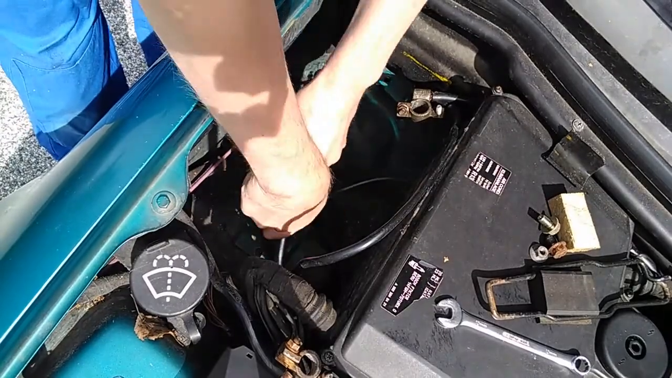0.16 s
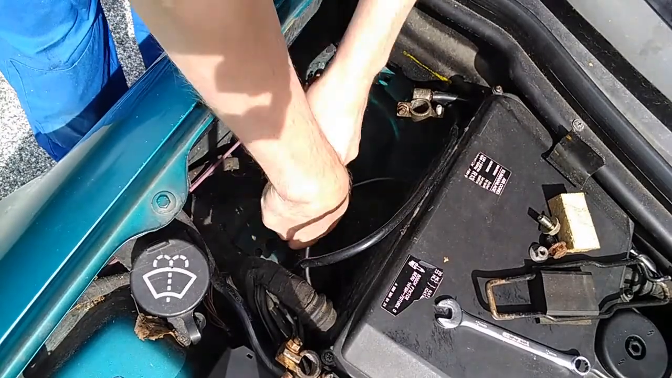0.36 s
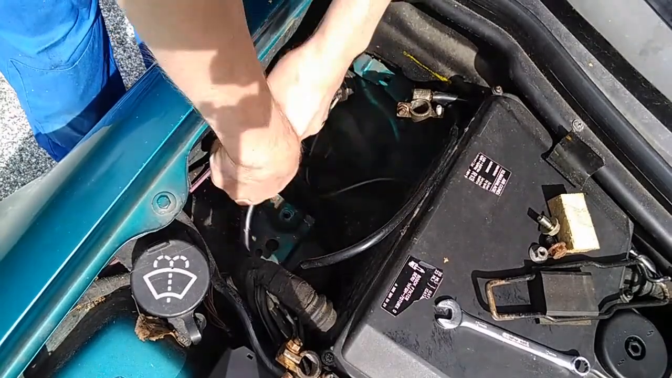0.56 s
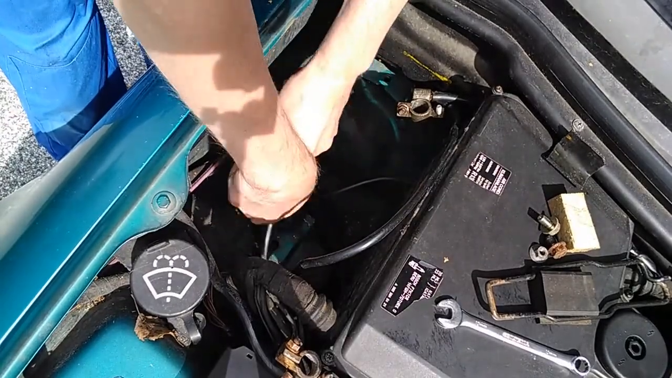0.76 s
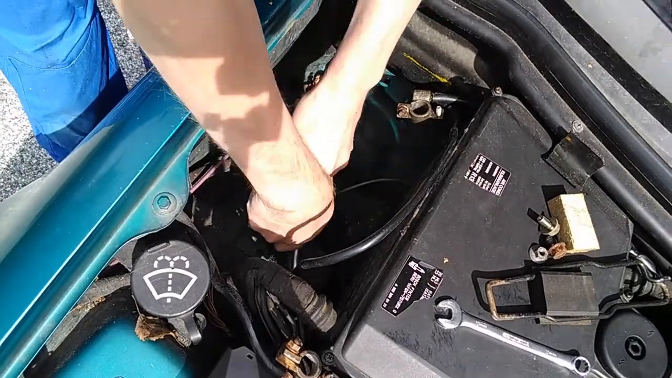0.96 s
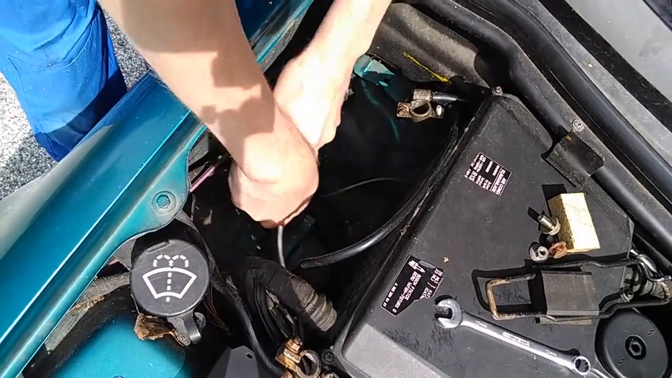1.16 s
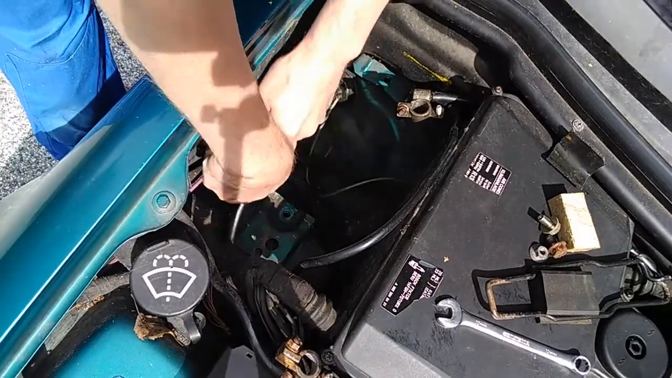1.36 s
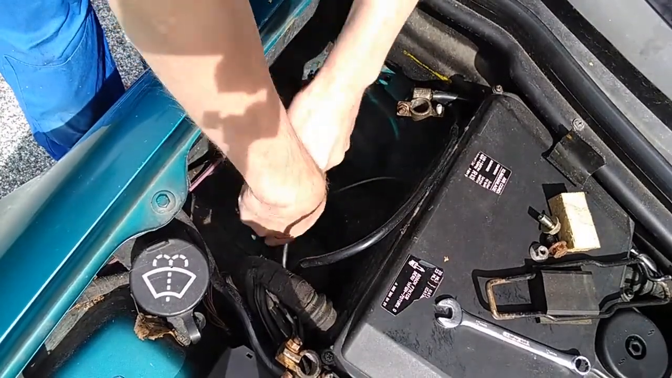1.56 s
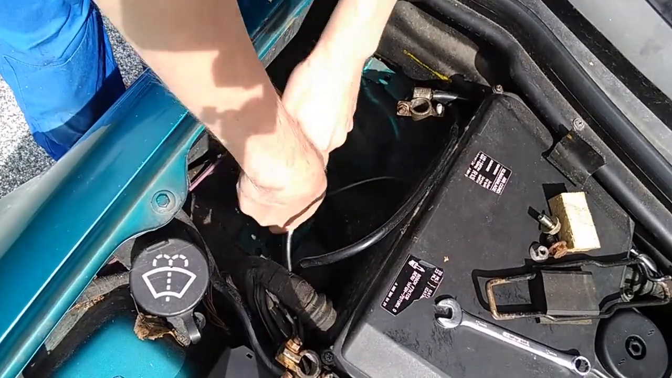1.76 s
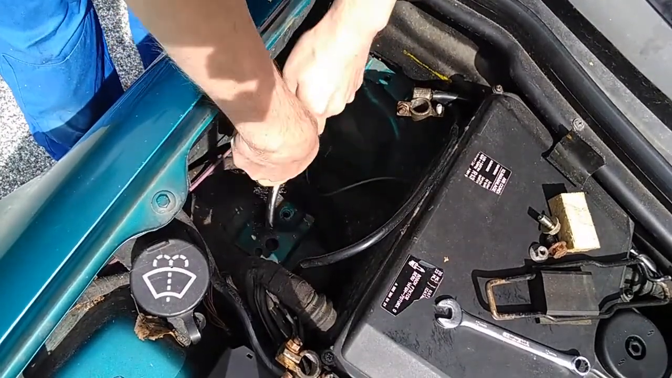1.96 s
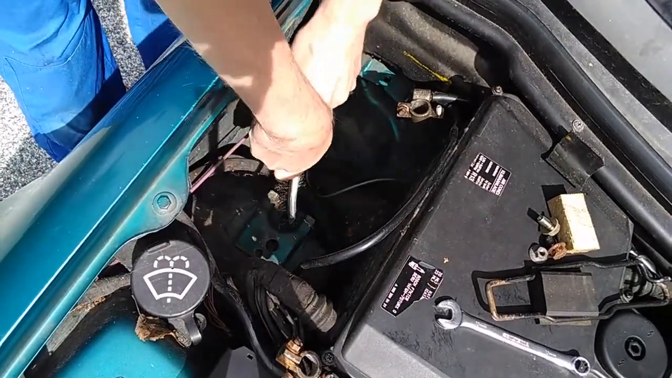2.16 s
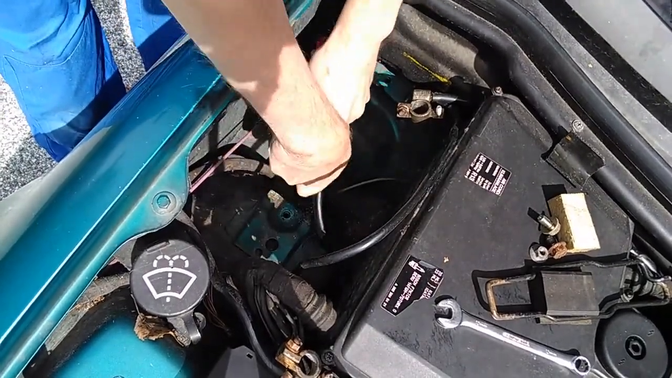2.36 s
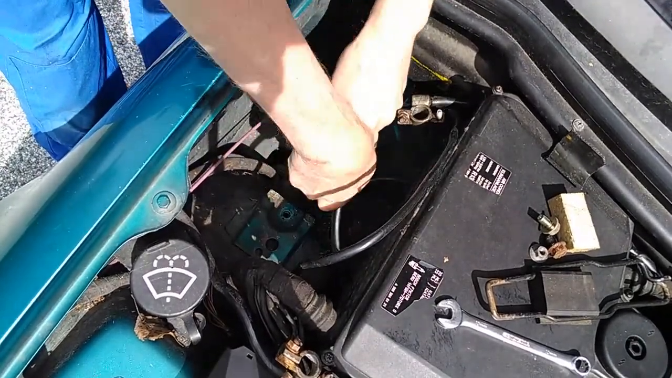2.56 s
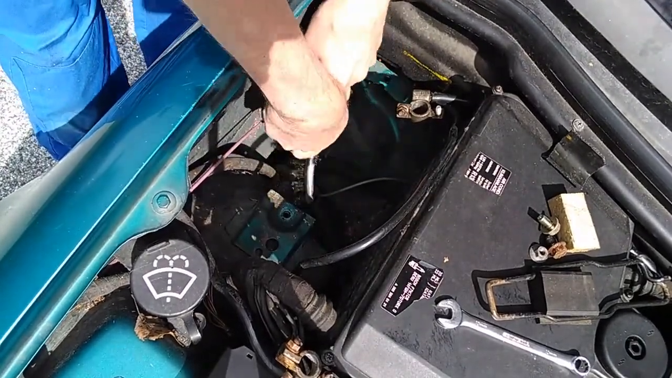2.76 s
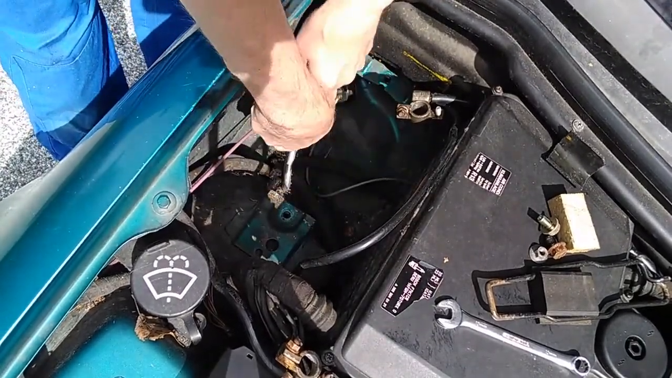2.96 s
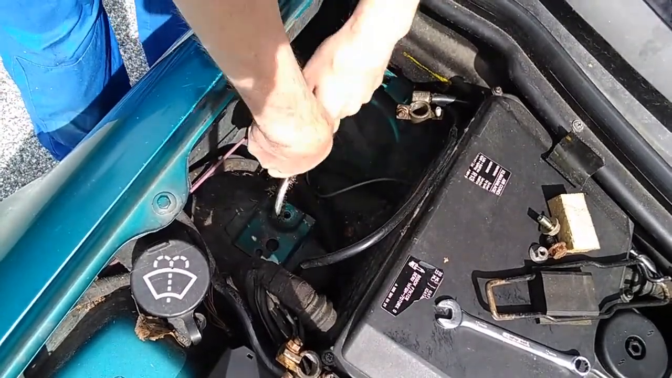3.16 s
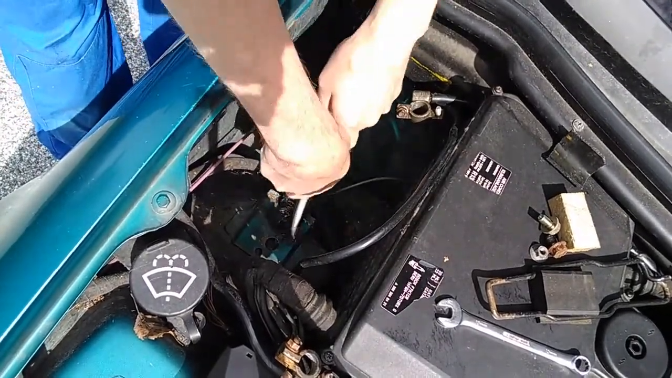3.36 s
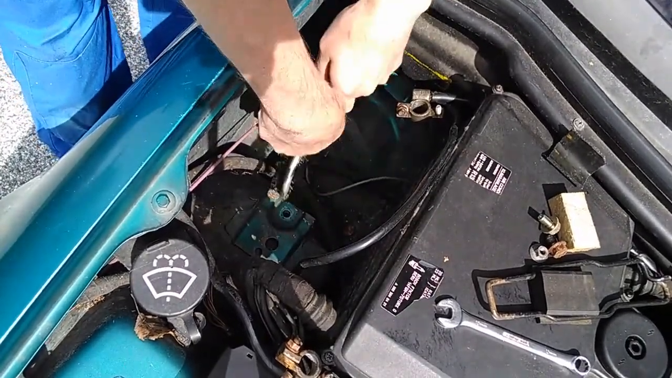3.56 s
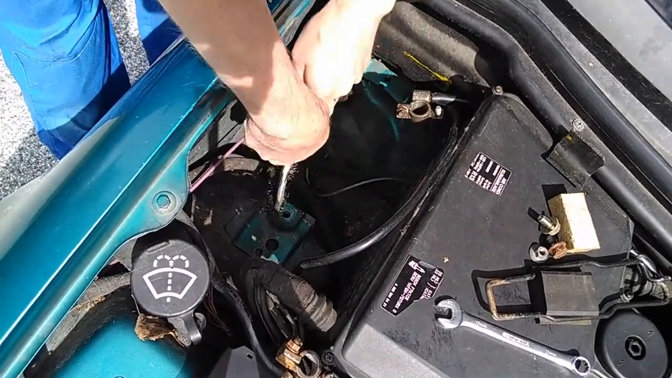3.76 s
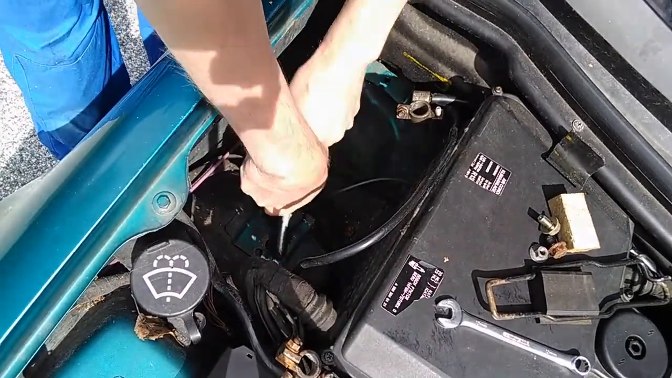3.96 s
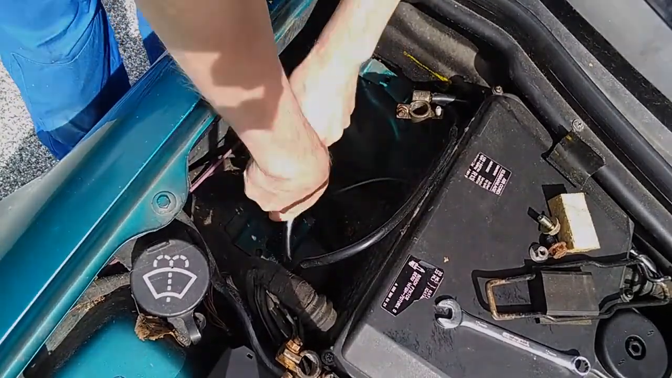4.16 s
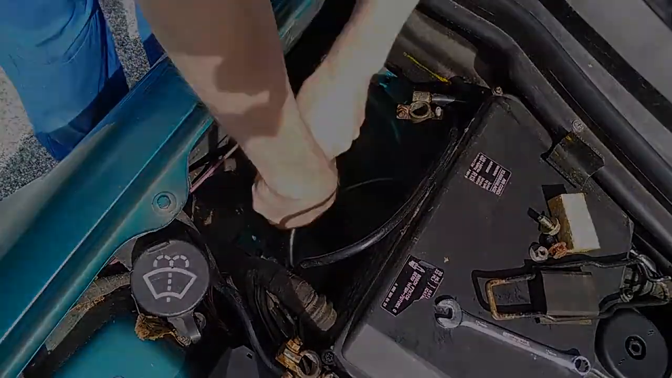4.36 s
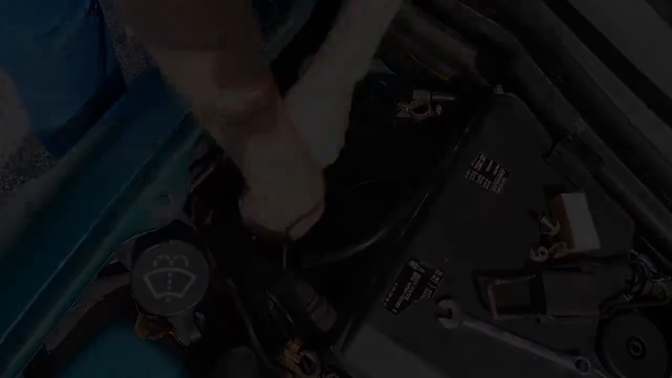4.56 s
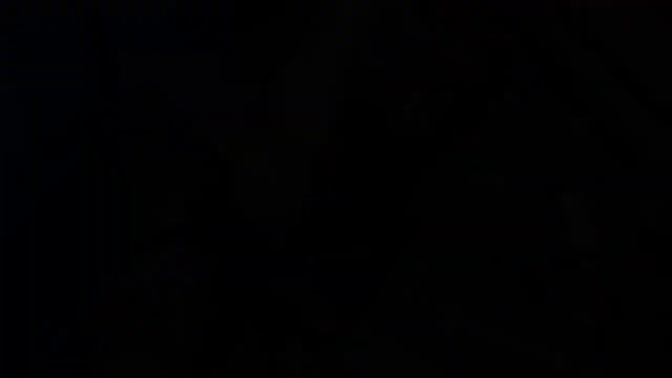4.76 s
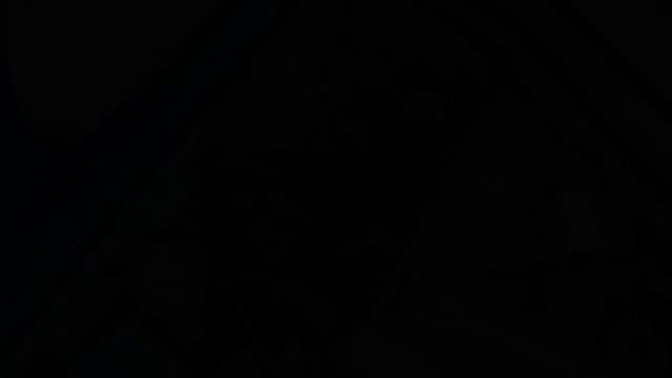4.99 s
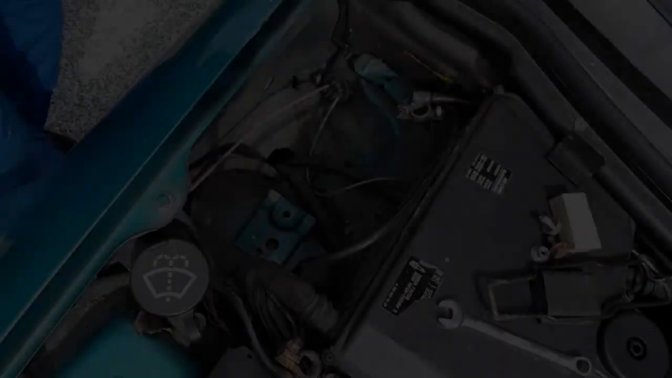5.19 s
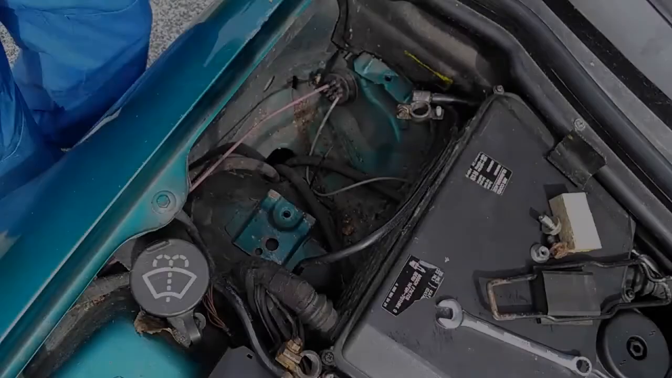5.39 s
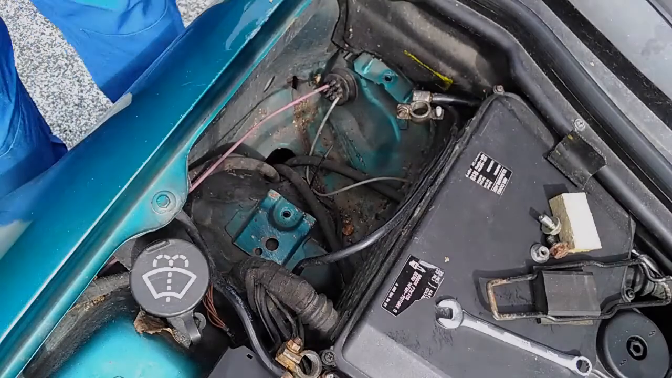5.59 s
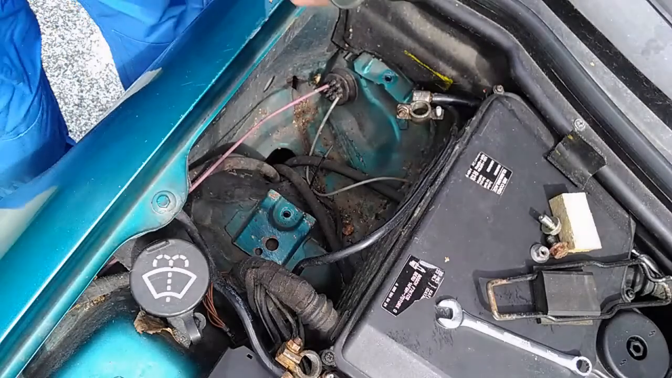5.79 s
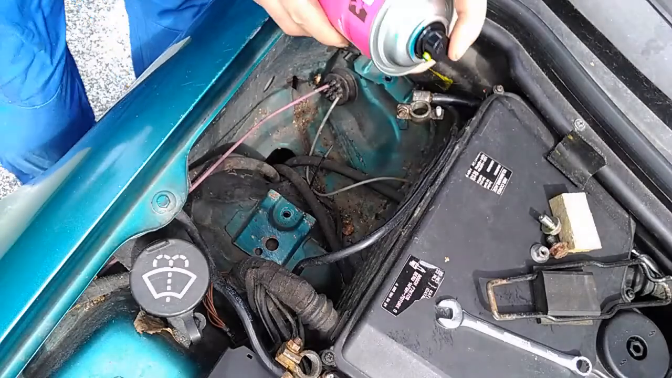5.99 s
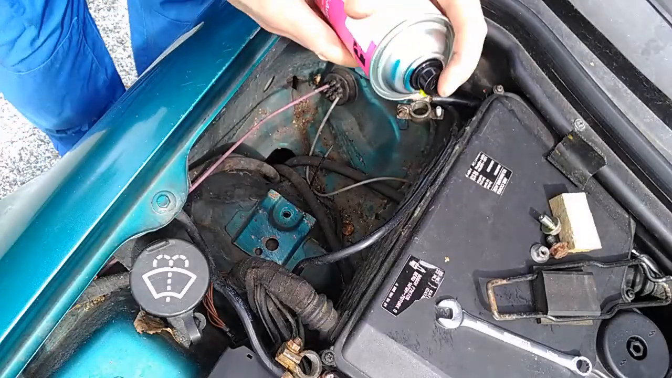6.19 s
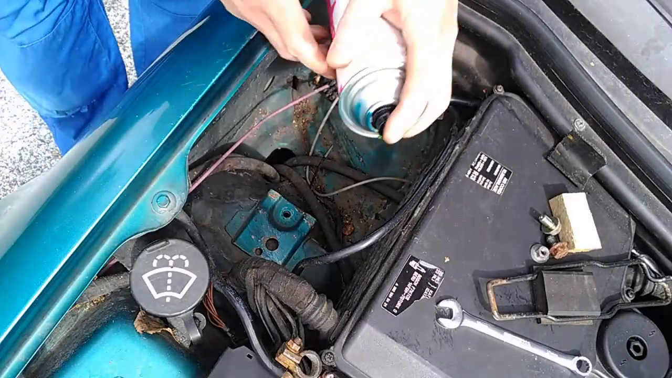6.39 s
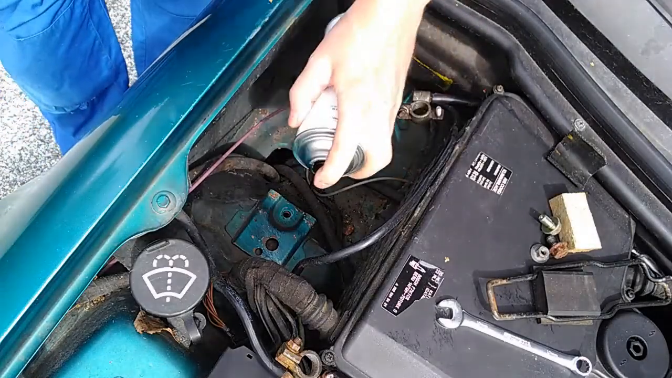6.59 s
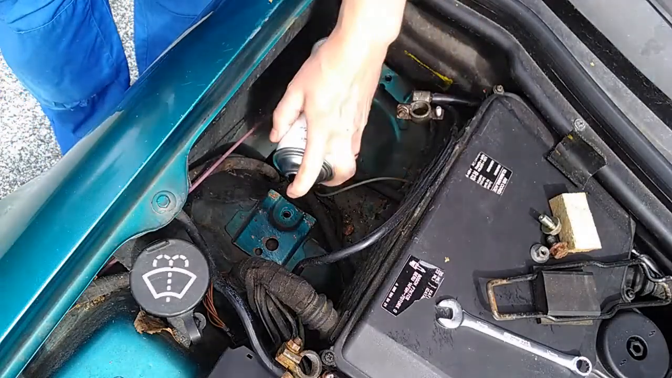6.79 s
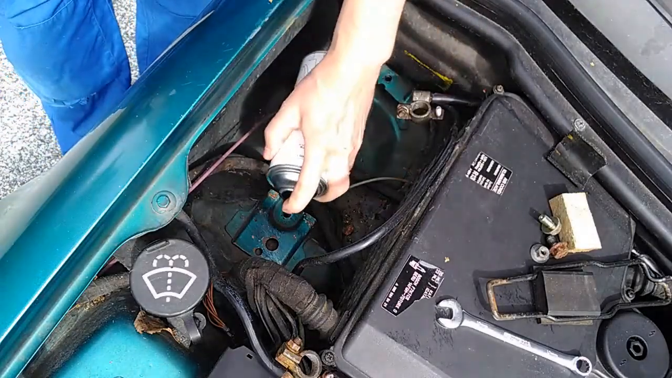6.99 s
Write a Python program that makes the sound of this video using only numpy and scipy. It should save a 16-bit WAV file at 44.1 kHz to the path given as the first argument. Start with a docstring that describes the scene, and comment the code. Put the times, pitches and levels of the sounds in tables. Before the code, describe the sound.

Rhythmic, gritty scraping of a wire brush on rusty steel is heard close to the microphone, outdoors over a car engine. Bristles ring and flick free, and the brush knocks the metal sharply three times, the last two during a run of faster strokes. Right after the last knock an aerosol can sputters with dry snaps and crackles, which die away into a soft hiss and distant rumble.

```python
"""Close over a car's engine bay, a wire brush scrubs a rusty steel battery tray in long strokes.
It lands with a thump, rasps as its wires catch on the rust, and sings as they flick free.
Just after 2 s its head bangs the metal; from 4 s come short quick strokes and two more bangs.
Near 5 s dry crackling spurts take over as a spray can is readied. They thin out and leave
a faint hiss over the outdoor rumble that lies under the whole scene."""
import sys
import numpy as np
from scipy import signal
from scipy.fft import rfft, irfft, next_fast_len
from scipy.io import wavfile
from scipy.ndimage import uniform_filter1d, map_coordinates

SR = 44100
rng = np.random.default_rng(int(sys.argv[2]) if len(sys.argv) > 2 else 0)


def output_pcm(signal):
    """Save a mono or channel-first signal as 16-bit PCM at the path in sys.argv[1].

    Samples are clipped to [-1, 1] before scaling.
    """
    pcm = np.clip(np.atleast_2d(signal).T, -1, 1) * 32767
    wavfile.write(sys.argv[1], SR, np.round(pcm).astype(np.int16))


N = 310464

# brush strokes, lifted in between until 4 s, then to and fro on the steel:
# (time [s], speeding up [s], slowing down [s], peak rasp [dB], swell to the peak [dB],
#  drop before the lift [dB], landing thump [dB], weight on the tray [dB], wire brightness [dB])
STROKES = [ (0.0, 0.0045, 0.031, -37, -2, 10, -23.5, -0.5, -3),
           (0.173, 0.12, 0.059, -25, 14.5, 18, -23.5, -2, 1),
           (0.455, 0.096, 0.086, -22.5, 16.5, 24, -20.5, 0, 1.5),
           (0.747, 0.088, 0.065, -24, 16, 11, -15, 0, 1.5),
           (1.01, 0.13, 0.085, -23.5, 17.5, 32, -19, 0, 1.5),
           (1.311, 0.096, 0.081, -23.5, 14.5, 20, -19, 1, 1.5),
           (1.588, 0.11, 0.082, -24.7, 13, 30, -31, -1.5, 3.5),
           (1.863, 0.008, 0.019, -48.5, 8, 0, -51, 1.5, 1),
           (1.906, 0.044, 0.088, -27.5, 14, 24, -29.5, 0.5, 5.5),
           (2.137, 0.081, 0.085, -27.5, 15.5, 29, -32, 1.5, 4.5),
           (2.38, 0.053, 0.093, -24, 21.5, 13, -41, 2.5, 0.5), (2.614, 0.01, 0.012, -60, 7, 8, -31, -8, -2),
           (2.661, 0.081, 0.029, -24, 15, 3, -23, -5, 3),
           (2.936, 0.067, 0.035, -24.5, 20, 3, -21.5, -1, 4.5),
           (3.208, 0.048, 0.082, -29, 8.5, 14.5, -29.5, 1, 4.5),
           (3.461, 0.063, 0.038, -28.5, 5, 3, -29, 2, 4),
           (3.728, 0.043, 0.078, -29.5, 10.5, 11.5, -32, 1.5, 6),
           (3.974, 0.0089, 0.018, -40, 10, 4.5, -29.5, -0.5, 3),
           (4.016, 0.06, 0.022, -21, 20, 18, -53, -3, -2),
           (4.117, 0.047, 0.093, -31.5, 9.5, 16, -55, -4.5, 4),
           (4.252, 0.038, 0.049, -28.5, 19, 9, -53, 0.5, 3),
           (4.355, 0.049, 0.068, -31.5, 12.5, 14, -55, -0.5, 4.5),
           (4.479, 0.051, 0.066, -36.5, 9, 4, -49, 0, 4),
           (4.606, 0.052, 0.037, -27.5, 8.5, 13, -59, -3.5, 1.5),
           (4.708, 0.087, 0.038, -27.5, 18, 19.5, -55, 0, 1),
           (4.838, 0.038, 0.055, -22.5, 18, 9.5, -55, -7, 0)]
# angle of the brush: (time [s], share of wires on an edge [0-1], ring of the brush body [dB])
BRUSH_ANGLE = [(.5, 0.08, 1), (.85, 0.13, -1), (1.7, 0.1, -17), (2.0, 0, 6), (2.25, 0.97, 6.5),
               (2.75, 1, -12), (3.5, 0.8, 2.5), (3.8, 0.17, 2), (4.15, 0, 12), (4.45, 0, 9),
               (4.9, 0.08, -7)]
# wires on rust: (frequency [Hz], level [dB])
RASP_EQ = [(50, -42), (90, -5.5), (160, -6), (470, -8), (700, 3.5), (1250, -1), (2200, 1), (2600, -7.5),
           (3700, -6), (4700, -3.5), (6500, -7), (8000, -9.5), (10500, -17), (13300, -9), (14200, -25)]
# low modes of the tray: (frequency [Hz], width [Hz], level [dB])
TRAY_MODES = [(209, 43, 9), (307.5, 55, 9), (403, 30.6, 4.5), (583, 34, 4.5), (723, 53, -14)]
# wires dragged over the flat: (frequency [Hz], width [Hz], level [dB])
FLAT_WIRE_MODES = [(1462, 83, 0), (2097, 244, 0.5), (3140, 430, -4), (4100, 110, -5), (5600, 200, 4.5)]
# wires bent over an edge: (frequency [Hz], width [Hz], level [dB])
EDGE_WIRE_MODES = [(1470, 230, -1.5), (1884, 92, 8.5), (4750, 450, 3.5), (5060, 180, -14), (5630, 560, 2)]
# where the shifting load colours the wires: (frequency [Hz], share of full depth [0-1])
SHIFT_REACH = [(300, .3), (1500, 1), (6500, 1), (10000, .5)]
# a few wires flick free: (time [s], level [dB])
FLICKS = [(0.0593, -42), (0.624, -32), (0.929, -33), (1.0395, -43), (1.1922, -33), (2.5494, -41),
          (2.783, -22), (2.816, -29.5), (3.05, -24), (3.213, -28), (3.3018, -19.5), (3.339, -29.5),
          (3.5618, -18.5), (3.638, -38.5), (4.3262, -24), (4.6565, -21)]
# the brush head bangs the metal: (time [s], level [dB])
BANGS = [(2.211, -7.5), (4.071, -9.5), (4.797, -6.5)]
# ring of the head on steel: (frequency [Hz], level [dB], 60 dB decay [s])
BANG_MODES = [(171.7, -14.5, 0.24), (414, -18, 0.27), (714, -1.5, 0.037), (920, -16, 0.21),
              (940, -34, 0.13), (1047, 3.5, 0.073), (1164, 1.5, 0.068), (1480, -13, 0.15), (1570, -44, 1.3),
              (1780, -21, 0.14), (1950, -16, 0.15), (2283, -20, 0.11)]
# dull clatter under a bang: (frequency [Hz], level [dB])
CLATTER_EQ = [(60, -27), (130, -7.5), (210, 3.5), (450, -7.5), (1150, -2), (1900, -9.5),
              (3500, -22.5), (9000, -48)]
# foreground crackles: (time [s], body [dB], treble over body [dB], pitch [Hz])
SNAPS = [(4.9505, -15, 4.5, 4700), (4.9802, -15.5, 10, 4130), (4.9871, -11.5, 0, 4130),
         (4.9951, -15.5, 10, 4420), (5.029, -18.5, 4, 4300), (5.0641, -7, -7, 4970),
         (5.0911, -9.5, -0.5, 4840), (5.1264, -23, -1, 2600), (5.1516, -20, -20, 4340),
         (5.2208, -14.5, 6, 4470), (5.2285, -11, 3.5, 2360), (5.251, -14, -2, 4300),
         (5.34, -11.5, -1, 4800), (5.3663, -9, -2.5, 4690), (5.397, -24, -2, 1840),
         (5.43, -13, -10.5, 2040), (5.4538, -21.5, -16, 2040), (5.507, -19, 7, 4750),
         (5.5407, -24.5, 3.5, 4520), (5.6616, -31, -1, 2270), (5.688, -21, -7, 2262),
         (5.7428, -22, -1, 5030), (5.7678, -24, 1.5, 4830), (5.841, -28.5, -0.5, 4530),
         (5.8776, -32, 1.5, 4400), (5.9003, -30, -11, 4440), (5.9147, -29, -0.5, 1780),
         (5.9472, -28, -7, 4300), (6.0044, -32.5, -3, 4560), (6.069, -38, -1, 3920),
         (6.212, -42.5, 2, 1830), (6.659, -39.5, -4, 4680)]
# dense spurts: (time [s], length [s], level [dB])
SPURTS = [(4.98, 0.049, -25.5), (5.229, 0.035, -20.5), (5.364, 0.0084, -16), (5.74, 0.04, -30)]
# bouts of fine crackle: (time [s], length [s], level [dB])
CRACKLE_BOUTS = [(4.92, 0.2, -25), (5.145, 0.172, -26.5), (5.439, 0.063, -31.5), (5.642, 0.051, -39.5),
                 (5.738, 0.085, -34), (5.87, 0.11, -42), (6.008, 0.092, -39)]
# tone of all the crackling: (frequency [Hz], level [dB])
CRACKLE_EQ = [(290, -21), (500, -14.5), (529, -14.5), (902, -8.5), (1340, -7.5), (1930, -1), (3790, -3.5),
              (4740, -1), (6740, -4.5), (8320, -16), (9440, -16), (11500, -23), (13400, -15), (14400, -29)]
# swells of the distant rumble: (time [s], half width [s], rise [dB])
RUMBLE_SWELLS = [(0.05, 0.15, 9), (2.62, 0.13, 6.5), (3.05, 0.15, 5.5), (5.55, 0.24, 10), (5.88, 0.15, 9),
                 (7.0, 0.2, 3)]
# broad outdoor ambience: (frequency [Hz], level [dB])
AMBIENCE_EQ = [(15, -50), (25, -30), (45, -10.5), (69, -6.5), (156, -9), (221, -13.5), (257, -11),
               (556, -10.5), (802, -12.5), (918, -10), (1180, -21), (2500, -40), (3250, -68), (5500, -120)]
# the hiss comes up slightly near the end: (time [s], level [dB])
HISS_FADER = [(5.6, -53.5), (6.2, -50.5)]
# tone of the hiss: (frequency [Hz], level [dB])
HISS_EQ = [(800, 4), (1600, 1), (3000, -1.5), (4700, 1.5), (6200, -1.5), (8000, -8.5), (11000, -11),
           (14000, -21)]
# stereo image of close sounds: (frequency [Hz], left-right likeness [0-1])
NEAR_IMAGE = [(40, .4), (130, 1), (300, 0.99), (640, 0.92), (1300, 0.71), (2500, 0.31), (6000, 0.037)]
# stereo image of distant sounds: (frequency [Hz], left-right likeness [0-1])
FAR_IMAGE = [(40, 0.55), (130, 0.79), (300, 0.81), (640, 0.54), (1400, 0.064)]
# reverb of the engine bay: (frequency [Hz], 60 dB decay [s])
BAY_DECAY = [(150, 0.18), (1000, 0.12), (5000, 0.017), (14000, 0.12)]
# balance of the microphone ports: (frequency [Hz], left minus right [dB])
PORT_BALANCE = [(40, -7.5), (150, -0.4), (1000, -2.5), (2000, -3.5), (3200, -6), (4000, -9.5), (5500, -21),
                (7000, -15), (9200, 1.5), (10300, -1.5), (11500, -15), (14000, -25)]

ARCH = 1.276  # shape of a stroke's swell: 1 pointed, 2 round
BITE_S, LIFT_S = .004, 0.087  # attack and release of a stroke
REBOUND_S, REBOUND_WIDTH_S, REBOUND_DB = 0.037, 0.01, 11  # wires bounce; dip for a full-scale thump
SKIPS_PER_S, SKIP_DB = 65, 0.58  # uneven drag over the rust
THUMP_ATTACK_S, THUMP_SCATTER_DB = .005, 1.8
SCRATCH_DB, SCRATCH_S = 7, 0.053  # first touch of the tips: level over the stroke's start, 60 dB decay
BOUT_RISE_S, BOUT_FADE_S = 0.011, .2
TICKS_PER_S, TICK_DB, TICK_SCATTER_DB = 35, 1, 2  # level is relative to the bout
TICK_TREBLE_DB, TICK_HZ, TICK_SCATTER_OCTAVES = -7.5, 3530, 0.52
RUMBLE_DB, AMBIENCE_DB, BAY_DB = -53, -47.5, -14
TOP_HZ = 14500


def scrubbing():
    """Wires catch on the rust; the catches drive the tray, and the wires ring according to their lie."""
    speed = brush_speed()
    effort = speed / speed.max()
    weight_db, bright_db = curves([(s + rise, weight, bright) for s, rise, *_, weight, bright in STROKES])
    edge, brush_db = curves(BRUSH_ANGLE)
    edge = edge.clip(0, 1)
    catches = grit(rate=1200, spread_db=2.0) * amp(2.36 * wobble(70))
    catches = shifting_load(catches, depth_db=3.2)
    rasp = unit(filtered(catches, lambda hz: np.hypot(eq(RASP_EQ, hz), mode_gain(TRAY_MODES, hz))))
    body = filtered(rasp, lambda hz: 1 / (1 + (hz / 900) ** 4))
    tips = filtered(rasp, lambda hz: 1 - 1 / (1 + (hz / 4000) ** 6))
    mids = rasp - body - tips
    # the tray answers even a light touch, so its level swings less than the rasp
    load = speed.max() * uniform_filter1d(effort, size=400).clip(0) ** 0.67
    scrape = speed * (mids + tips * amp(bright_db)) + load * body * amp(weight_db)
    plucks = shifting_load(grit(rate=500, spread_db=3), depth_db=3.5)
    ring = lambda modes: unit(filtered(plucks, lambda hz: mode_gain(modes, hz)))
    on_flat = amp(0.5) * np.sqrt(1 - edge) * ring(FLAT_WIRE_MODES)
    on_edge = amp(-1) * np.sqrt(edge) * ring(EDGE_WIRE_MODES)
    brush_body = amp(brush_db - 16) * ring([(2866, 20, 0)])
    # a lightly loaded brush rings more freely than one pressed down hard
    freedom = amp(1.5 - 2.5 * np.sqrt(effort))
    flutter = amp(1.7 * wobble(35))
    singing = speed * freedom * ((on_flat + on_edge) * flutter + brush_body)
    return stereo(scrape + singing, NEAR_IMAGE, lag_s=.00017)


def brush_speed():
    """Stroke envelopes: the wires bite and rebound, the hand speeds up and slows, the wires let go."""
    speed, t = np.zeros(N), np.arange(SR // 2) / SR
    for s, rise, fall, db, swell_db, drop_db, thump_db, *_ in STROKES:
        from_peak = np.interp(t, [0, rise, rise + fall], [1, 0, 1])
        arch_db = np.where(t < rise, swell_db, drop_db) * from_peak ** ARCH
        bounce = np.exp(-((t - REBOUND_S) / REBOUND_WIDTH_S) ** 2)
        bounce_db = REBOUND_DB * np.sqrt(amp(thump_db)) * bounce
        add(speed, s, amp(db - arch_db - bounce_db) * burst(t, rise + fall, BITE_S, LIFT_S))
    return speed * amp(SKIP_DB * wobble(SKIPS_PER_S))


def shifting_load(x, depth_db):
    """Brief narrow resonances come and go as different wires take the load."""
    hz, _, spectrum = signal.stft(x, SR, nperseg=1024)
    patches = uniform_filter1d(rng.standard_normal(spectrum.shape[1:]), size=3, axis=0)
    patches = unit(uniform_filter1d(patches, size=7, axis=1))
    gain = amp(depth_db * along(SHIFT_REACH, hz)[:, None] * patches)
    return signal.istft(spectrum * gain, SR, nperseg=1024)[1][:, :N]


def wire_flicks():
    """Bent wires spring loose in bunches of ten and ping, each at its own pitch."""
    track, t = np.zeros((2, N)), np.arange(SR // 12) / SR
    for s, db in FLICKS:
        pitches = 5700 * np.exp(0.065 * rng.standard_normal((2, 10, 1)))
        age = np.maximum(t - rng.uniform(0, 0.014, (10, 1)), 0)
        pings = np.sin(2 * np.pi * pitches * age) * decay(age, 0.017)
        add(track, s - .011, amp(db - 1.5) * pings.sum(1))
    return track


def brush_landings():
    """The bristles meet the tray: a soft push wakes its low modes and the tips give a short scratch."""
    thumps, tips, t = np.zeros(N), np.zeros((2, N)), np.arange(SR // 4) / SR
    for s, _, _, rasp_db, swell_db, _, thump_db, *_ in STROKES:
        thump = np.zeros(len(t))
        for hz, width, mode_db in TRAY_MODES:
            gain = amp(mode_db + rng.normal(0, THUMP_SCATTER_DB)) / (1 + (hz / 290) ** 3)
            pitch = hz * rng.normal(0.96, 0.029)
            thump += gain * np.exp(-np.pi * width * .7 * t) * np.sin(2 * np.pi * pitch * t)
        add(thumps, s - .002, amp(thump_db - 1) * thump * attack(t, THUMP_ATTACK_S))
        add(tips, s - .001, amp(rasp_db - swell_db + SCRATCH_DB) * noise(len(t)) * decay(t, SCRATCH_S))
    scratch = filtered(tips, lambda hz: unit(eq(RASP_EQ, hz)))
    return thumps + stereo(scratch, NEAR_IMAGE, lag_s=0.00012)


def head_bangs():
    """The hard brush head strikes: steel modes ring over a short dull clatter."""
    ring, clatter, t = np.zeros((2, N)), np.zeros((2, N)), np.arange(SR // 3) / SR
    for s, db in BANGS:
        clang = np.zeros(len(t))
        for hz, mode_db, t60 in BANG_MODES:
            envelope = amp(mode_db + rng.normal(0, 1.24)) * attack(t, 0.00059) * decay(t, t60)
            clang += envelope * np.sin(2 * np.pi * hz * t + rng.uniform(0, 2 * np.pi))
        add(ring, s + 0.00203, amp(db - 4) * clang / abs(clang).max())
        add(clatter, s + 0.001935, amp(db + 10) * noise(len(t)) * decay(t, 0.07))
    clatter = filtered(clatter, lambda hz: eq(CLATTER_EQ, hz))
    return stereo(ring + clatter, NEAR_IMAGE, lag_s=0.00017)


def can_crackle():
    """The spray can is readied: dry millisecond snaps, each with its own pitch, over a crackling bed."""
    body, treble, t = np.zeros((2, N)), np.zeros((2, N)), np.arange(SR // 12) / SR
    bins_hz = np.fft.rfftfreq(len(t), 1 / SR)
    for s, db, treble_db, pitch in list(SNAPS) + ticks():
        envelope = amp(db + 8.5) * attack(t, 0.00058) * decay(t, 0.018)
        white = noise(len(t))
        pitched = unit(irfft(rfft(white) * resonance(bins_hz, pitch, width_hz=320), len(t)))
        add(body, s, envelope * (.5 * white + .42 * pitched))
        add(treble, s, envelope * white * amp(treble_db + 3))
    bed = crackle_bed()
    crossover = lambda hz: 1 / (1 + (hz / 5200) ** 8)
    colour = lambda hz: unit(eq(CRACKLE_EQ, hz))
    lows = filtered(body + bed, lambda hz: colour(hz) * crossover(hz))
    highs = filtered(treble + bed, lambda hz: colour(hz) * (1 - crossover(hz)))
    return stereo(lows + highs, NEAR_IMAGE, lag_s=0.000335)


def ticks():
    """Small snaps scattered through each bout of crackle, as rows like SNAPS."""
    rows = []
    for s, length, db in CRACKLE_BOUTS:
        for k, (jitter, size, detune) in enumerate(rng.standard_normal((24, 3))):
            delay = abs(k + .5 + .3 * jitter) / TICKS_PER_S
            pitch = TICK_HZ * 2 ** (TICK_SCATTER_OCTAVES * detune)
            if delay < length:
                rows.append((s + delay, db + TICK_DB + TICK_SCATTER_DB * size, TICK_TREBLE_DB, pitch))
    return rows


def crackle_bed():
    """Bouts of fine grainy crackle with short dense spurts of noise on top."""
    bouts, t = np.zeros(N), np.arange(SR // 2) / SR
    for s, length, db in CRACKLE_BOUTS:
        add(bouts, s, amp(db - 2.5) * burst(t, length, BOUT_RISE_S, BOUT_FADE_S))
    bed = bouts * grit(rate=450, spread_db=4.5)
    t = t[:SR // 12]
    for s, length, db in SPURTS:
        add(bed, s, amp(db) * burst(t, length, rise_s=0.0035, fade_s=0.055) * noise(len(t)))
    return bed


def bay_reverb(x):
    """Short dense echoes from the walls of the engine bay."""
    hz, t, spectrum = signal.stft(noise(SR // 4), SR, nperseg=256)
    tail = signal.istft(spectrum * decay(t, along(BAY_DECAY, hz)[:, None]), SR, nperseg=256)[1]
    tail = np.pad(tail, ((0, 0), (SR // 500, 0)))  # 2 ms pre-delay
    return signal.fftconvolve(x, tail / np.linalg.norm(tail[0]), axes=1)[:, :N]


def outdoors():
    """Distant rumble that swells now and then, broad ambience and a thin hiss."""
    t = np.arange(N) / SR
    drift_db = .8 * wobble(6.7)
    swell_db = sum(db * np.exp(-((t - s) / width) ** 2) for s, width, db in RUMBLE_SWELLS)
    rumble = unit(filtered(noise(), lambda hz: abs(resonance(hz, centre_hz=82.4, width_hz=62)) ** 2))
    rumble *= amp(RUMBLE_DB + swell_db + 2.1 * wobble(7.5))
    ambience = unit(filtered(noise(), lambda hz: eq(AMBIENCE_EQ, hz))) * amp(AMBIENCE_DB + drift_db)
    hiss = unit(filtered(noise(), lambda hz: eq(HISS_EQ, hz))) * amp(curves(HISS_FADER)[0])
    return stereo(rumble + ambience + hiss, FAR_IMAGE, lag_s=0)


def amp(db):
    """Decibels to gain."""
    return 10 ** (np.asarray(db) / 20)


def unit(x):
    """x at rms 1."""
    return x / np.sqrt(np.mean(x ** 2) + 1e-20)


def along(points, hz):
    """Read (frequency [Hz], value) points on a log axis."""
    freqs, values = np.transpose(points)
    return np.interp(np.log(hz + 1), np.log(freqs + 1), values)


def eq(points, hz):
    """Gain of an EQ curve."""
    return amp(along(points, hz))


def curves(rows):
    """Automation: one value per sample for each column after the time."""
    times, *columns = np.transpose(rows)
    return [np.interp(np.arange(N) / SR, times, column) for column in columns]


def attack(t, rise_s):
    """A rounded onset with time constant rise_s."""
    return 1 - np.exp(-t / rise_s)


def decay(t, t60):
    """A fall of 60 dB every t60 seconds."""
    return amp(-60 * t / t60)


def burst(t, length, rise_s, fade_s):
    """Attack, hold until length, then a fall of 60 dB in fade_s."""
    return np.clip(t / rise_s, 0, 1) * decay(np.maximum(t - length, 0), fade_s)


def noise(samples=N):
    """Two unrelated white noises."""
    return rng.standard_normal((2, samples))


def wobble(rate):
    """A smooth random curve, rate knots a second."""
    return map_coordinates(rng.standard_normal(int(N * rate / SR) + 4), [np.arange(N) * rate / SR])


def grit(rate, spread_db):
    """Noise in tiny grains of uneven size, rms 1."""
    return unit(noise() * amp(spread_db * wobble(rate)))


def filtered(x, response):
    """x through a complex frequency response."""
    size = next_fast_len(N + SR // 2)
    return irfft(rfft(x, size) * response(np.fft.rfftfreq(size, 1 / SR)), size)[..., :N]


def resonance(hz, centre_hz, width_hz):
    """Causal response of one mode."""
    return 1j * hz * width_hz / (centre_hz ** 2 - hz ** 2 + 1j * hz * width_hz)


def mode_gain(modes, hz):
    """Gain of a bank of resonances: (frequency [Hz], width [Hz], level [dB])."""
    return np.sqrt(sum(abs(amp(db) * resonance(hz, centre, width)) ** 2 for centre, width, db in modes))


def add(track, s, sound):
    """Mix a sound into a track at time s."""
    start = max(round(s * SR), 0)
    slot = track[..., start:start + sound.shape[-1]]
    slot += sound[..., :slot.shape[-1]]


def stereo(pair, image, lag_s):
    """Two unrelated signals as mid and side; the left channel arrives lag_s after the right."""
    angle = lambda hz: np.arccos(np.clip(along(image, hz), -1, 1)) / 2
    mid, side = filtered(pair, lambda hz: np.array([np.cos(angle(hz)), np.sin(angle(hz))]))
    delays = lambda hz: np.exp(np.pi * 1j * hz * lag_s * np.array([[-1], [1]]))
    return filtered(np.array([mid + side, mid - side]), delays)


def scene():
    """The work in the engine bay, its echoes and the outdoor background."""
    work = scrubbing() + wire_flicks() + brush_landings() + head_bangs() + can_crackle()
    return work + amp(BAY_DB) * bay_reverb(work) + outdoors()


def record(dry):
    """Two unlike microphone ports; the treble arrives a little late and the highest peaks are rounded."""
    def ports(hz, treble_lag_s=.00666):
        left = eq(PORT_BALANCE, hz)
        balance = np.array([left, np.ones_like(hz)]) * np.sqrt(2 / (1 + left ** 2))
        crossfade = np.pi / 2 / (1 + np.exp(np.clip((5080 - hz) / 330, -40, 40)))
        return balance * (np.cos(crossfade) + np.sin(crossfade) * np.exp(-2j * np.pi * hz * treble_lag_s))

    heard = filtered(dry, ports)
    rounded = heard / (1 + abs(heard / .8) ** 4) ** (1 / 4)
    return filtered(rounded, lambda hz: 1 / np.sqrt(1 + (hz / TOP_HZ) ** 200))


dry = scene()
out = record(dry)
output_pcm(out)
```